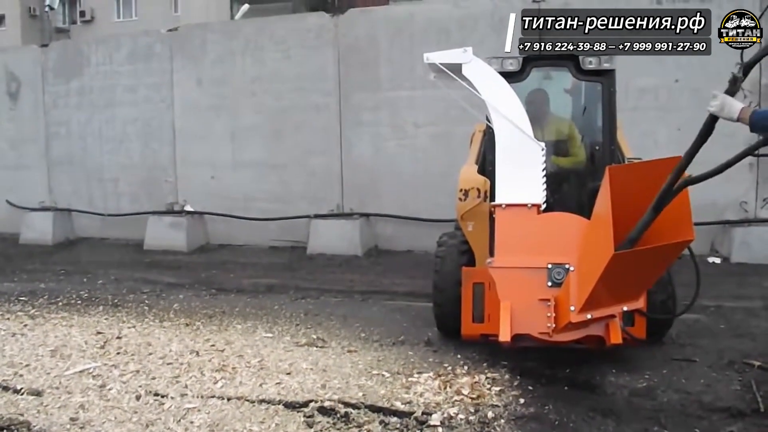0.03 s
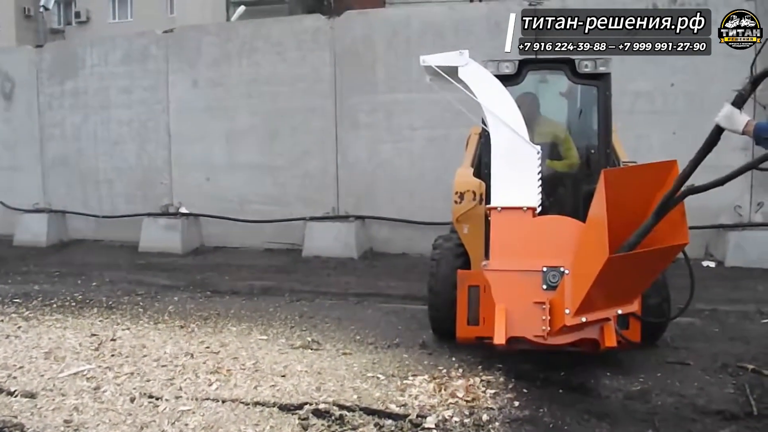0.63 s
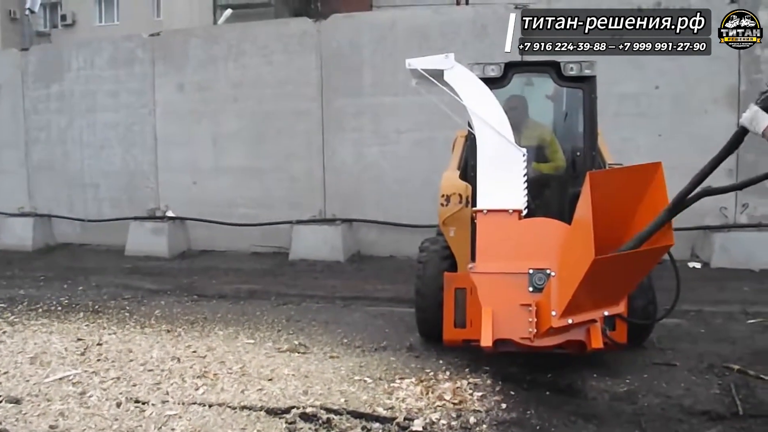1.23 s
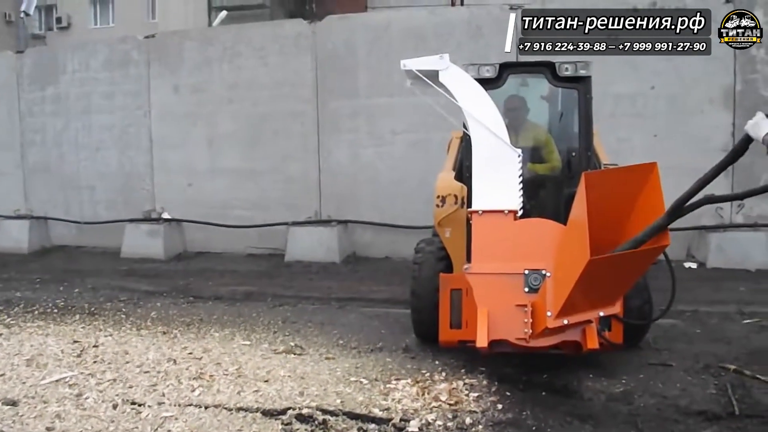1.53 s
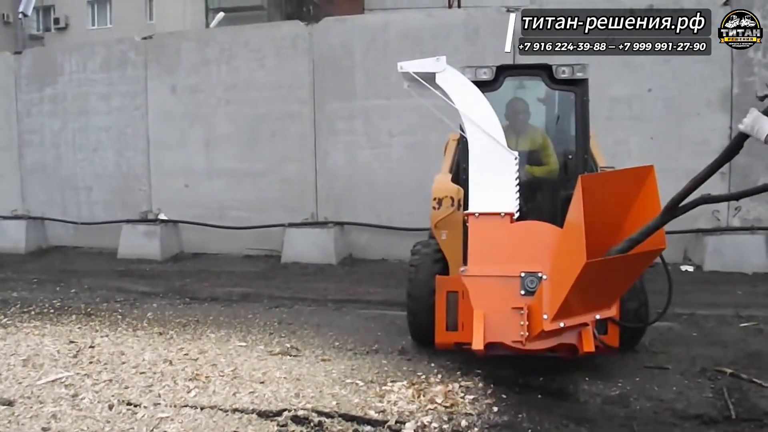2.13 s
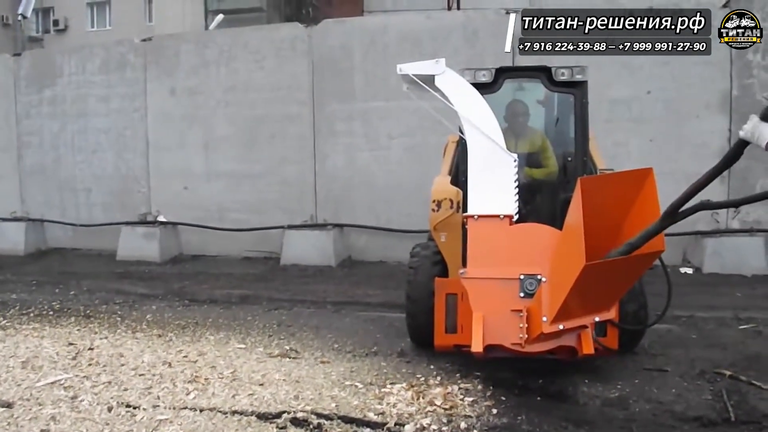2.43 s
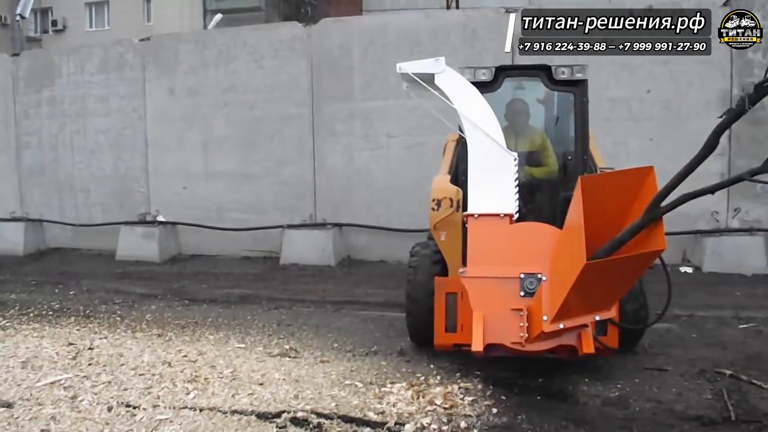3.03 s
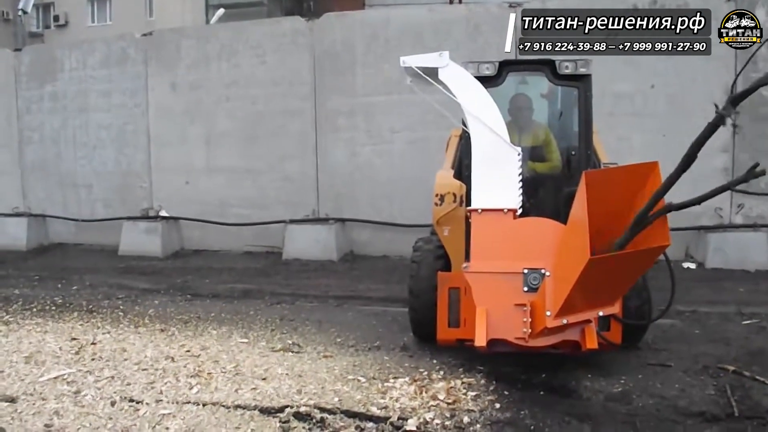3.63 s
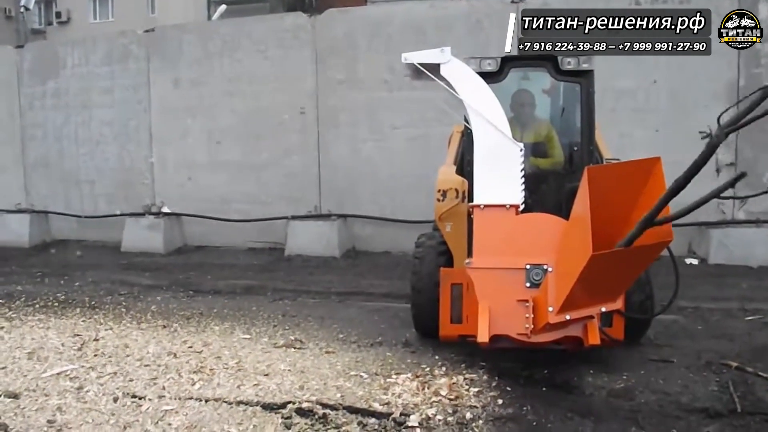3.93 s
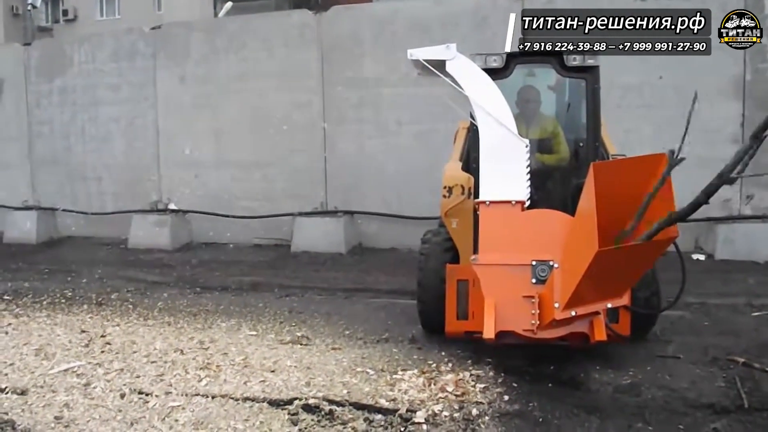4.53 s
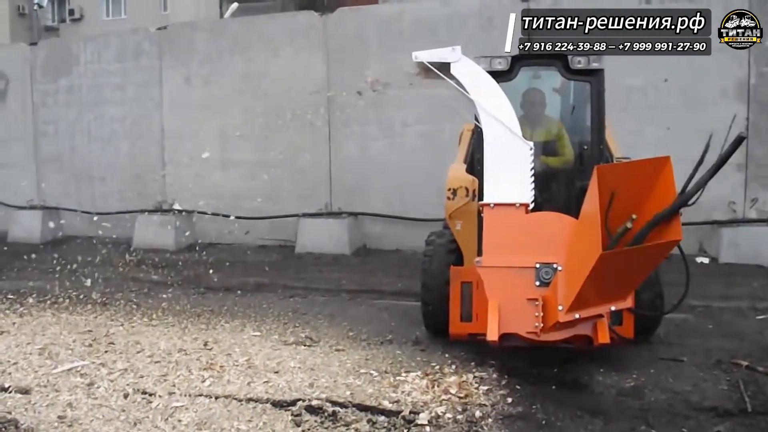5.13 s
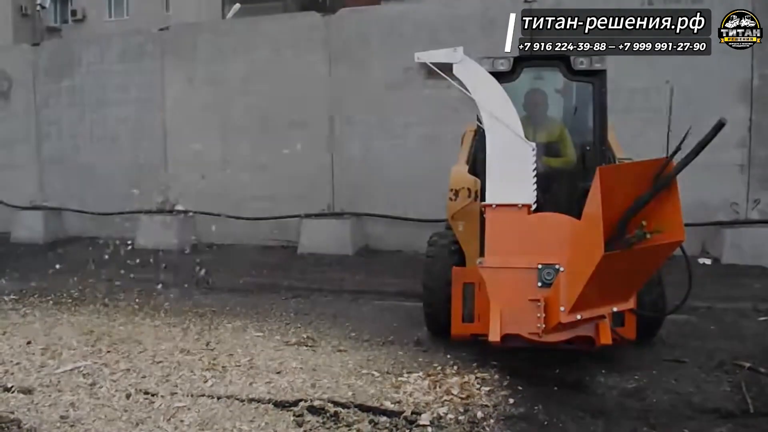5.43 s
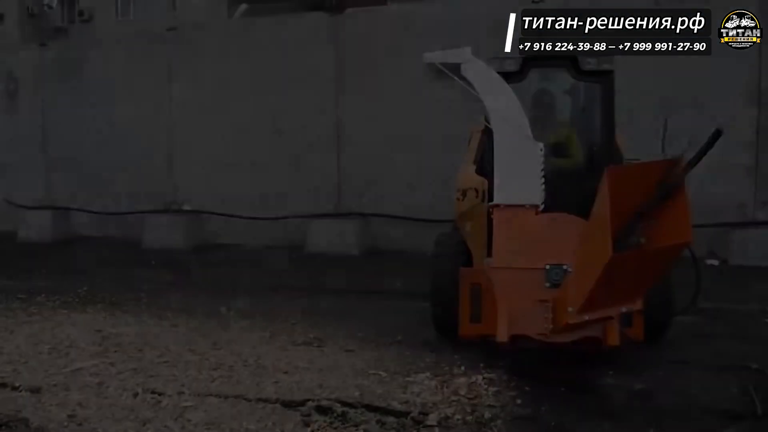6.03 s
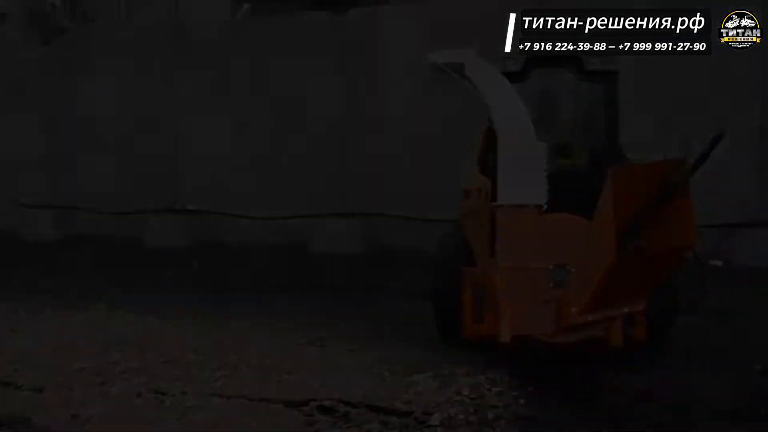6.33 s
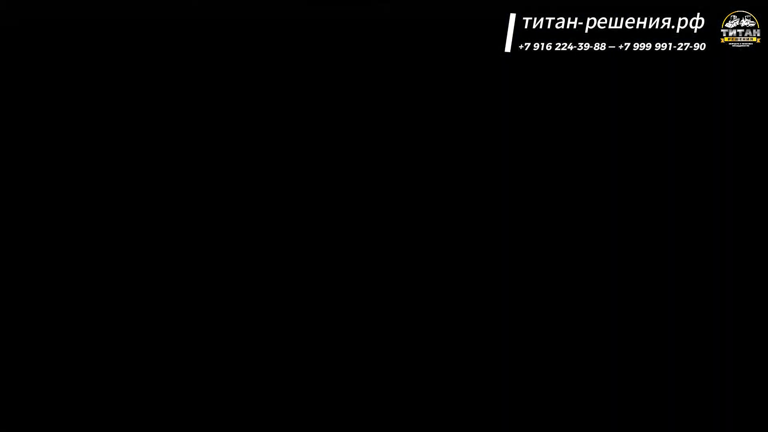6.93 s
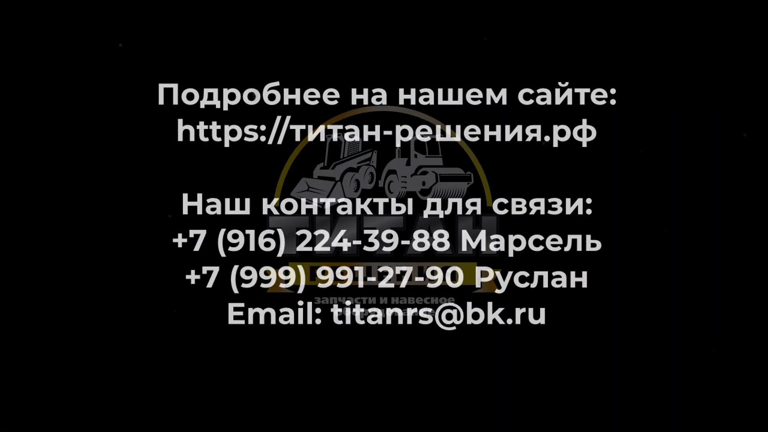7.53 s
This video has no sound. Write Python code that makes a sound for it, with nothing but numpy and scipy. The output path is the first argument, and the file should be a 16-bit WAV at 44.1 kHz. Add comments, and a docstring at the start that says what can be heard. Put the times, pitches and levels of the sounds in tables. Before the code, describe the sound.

A loud wood chipper is already running, a few metres away in an outdoor yard with a short, dull echo. A pulsing drone of air, a hydraulic hum and a high gear whine lie under a constant rattle of chips on steel. In the first second a branch chatters in the hopper and is torn up, with a brief rough squeal. The machine then runs more evenly, with surges of chips near 1.6 and 2.4 seconds. From about 3 seconds the bites crowd together: rasping wood, hollow booms, another short squeal and bright snaps, while the drone chokes away. Hard knocks strike the housing, the strongest near 4.9 and 5.6 seconds, and the hum swells briefly around 5.3. The drone partly returns near 6 seconds as the grinding continues. The sound fades from 6.8 seconds and stops just after 7.

```python
"""A disc wood chipper on a skid-steer loader runs at full speed in a yard, a concrete wall behind it.
From the start its paddles pump air, the hydraulic drive hums and chips stream out. Each time a branch is
drawn in, the knives tear it, the hopper booms and a surge of chips pelts the steel housing and spout.
Wood chatters, knocks and snaps; the hopper briefly rings out. After 3 s the bites crowd together and the
paddle tone chokes; it partly returns near 6 s, just before the sound fades and stops."""
import sys
import numpy as np
from scipy import signal
from scipy.fft import rfft, irfft
from scipy.io import wavfile
from scipy.ndimage import uniform_filter1d, minimum_filter1d

SR = 44100
rng = np.random.default_rng(int(sys.argv[2]) if len(sys.argv) > 2 else 0)


def int16_out(signal):
    """Quantize to a 16-bit WAV file."""
    q = np.round(np.clip(np.atleast_2d(signal).T, -1, 1) * 32767)
    wavfile.write(sys.argv[1], SR, q.astype(np.int16))


N = 342657
TIME = np.arange(N) / SR


def undb(db):
    """Decibels to gain."""
    return 10 ** (np.asarray(db) / 20)


def curves(table):
    """Automation curves: each column of a timed table at every sample."""
    time_s, *columns = np.transpose(table)
    return [np.interp(TIME, time_s, column) for column in columns]


def swollen(steady_db, power):
    """Level in dB of a steady bed with surges on top."""
    return 10 * np.log10(undb(steady_db) ** 2 + power)


def unit(x):
    """Scale to rms 1."""
    return x / np.sqrt(np.mean(x ** 2))


def walk(rate_hz):
    """Smooth random modulation: sample-and-hold, slewed twice; rms 1."""
    hold = max(int(SR / rate_hz), 2)
    held = rng.standard_normal(8192)[np.arange(N) // hold % 8192]
    return unit(uniform_filter1d(uniform_filter1d(held, hold), hold))


def colour(points, size=2048):
    """Minimum-phase impulse response of an EQ curve; unit energy."""
    hz, db = np.transpose(points)
    bins_hz = np.maximum(np.fft.rfftfreq(size, 1 / SR), 1)
    gain = undb(np.interp(np.log(bins_hz), np.log(hz), db))
    cepstrum = irfft(np.log(gain))
    cepstrum[1:size // 2] *= 2
    cepstrum[size // 2 + 1:] = 0
    response = irfft(np.exp(rfft(cepstrum)))
    return response / np.linalg.norm(response)


def ringing(modes, size=8192):
    """Impulse response of damped modes of alternating polarity; unit energy."""
    t = TIME[:size]
    response = sum(undb(db) * width * np.exp(-np.pi * width * t) * np.sin(2 * np.pi * hz * t + np.pi * k)
                   for k, (hz, width, db) in enumerate(modes))
    return response / np.linalg.norm(response)


def through(x, response):
    """Pass a sound through an impulse response."""
    return signal.oaconvolve(x, response)[:N]


def grains(per_s, spread_db):
    """Crackle: random clicks, more uneven as the spread grows; rms 1."""
    size = undb(spread_db * np.minimum(rng.standard_exponential(N), 4))
    return unit((rng.random(N) < per_s / SR) * size * rng.choice([-1, 1], N))


def tone(hz, wander, flutter_db):
    """A sine whose pitch and level waver; rms 1."""
    cycles = np.cumsum(hz * (1 + wander * walk(18))) / SR
    return unit(np.sin(2 * np.pi * cycles) * undb(flutter_db * walk(22)))


def blows(rows, strike_db, strike_s):
    """Noise bursts: a sharp transient over a dying crunch; rows of start_s, level_db, decay_s."""
    force, t = np.zeros(N), TIME[:SR // 8]
    for start_s, db, decay_s in rows:
        first = int(start_s * SR)
        envelope = np.exp(-t / decay_s) + undb(strike_db) * np.exp(-t / strike_s)
        force[first:first + len(t)] += undb(db) * envelope * rng.choice([-1, 1], len(t))
    return force


# air pumped by the paddles, choked once wood fills the inlet: time_s, tone_db, rumble_db
AIRFLOW = [(.1, -30, -23.5), (.2, -35, -35.5), (.58, -37, -38), (.68, -31.5, -26.5), (2.55, -27, -25.5),
           (3.15, -31, -26), (3.8, -57, -57), (4.19, -57, -26), (4.42, -60.5, -42), (5.3, -63, -43.5),
           (5.9, -47, -36), (6.8, -44, -36), (7.05, -50, -41)]
# harmonics of the paddle tone: paddle_rate_multiple, level_db
PADDLE_HARMONICS = [(1, 1), (2, -23), (3, -7.5), (4, -3), (5, 3.5), (7, -24), (8, -9.5), (9, -13)]
# dark rumble of the air: frequency_hz, gain_db
AIR_EQ = [(10, -19.5), (25, 5), (50, -2), (100, 1), (140, -5.5), (350, -2.5), (600, -3), (1000, -22),
          (8000, -59)]
def blower(turns_hz):
    """Three paddles pass the outlet on each turn, each shedding a puff of turbulence."""
    tone_db, rumble_db = curves(AIRFLOW)
    passes = 3 * np.cumsum(turns_hz) / SR
    drone = sum(undb(db) * tone(3 * k * turns_hz, wander=.0012, flutter_db=1.2)
                for k, db in PADDLE_HARMONICS)
    air = unit(through(rng.standard_normal(N), colour(AIR_EQ)))
    puffs = air * (1 + .24 * np.cos(2 * np.pi * passes))
    gusts = undb(1.5 * walk(12))
    return undb(tone_db) * drone + undb(rumble_db - 1.5) * puffs * gusts


# hum of the hydraulic motor: time_s, level_db
HUM_LEVEL = [(.6, -30.5), (.9, -26.5), (3.13, -23.5), (3.22, -38), (3.72, -36.5), (3.85, -25),
             (4.13, -24.5), (4.2, -37), (5.24, -34), (5.33, -16.5), (5.52, -42), (5.75, -24.5), (6.15, -21),
             (6.55, -24), (6.82, -19.5), (7.05, -33.5)]
# gear whine, weaker under load: time_s, level_db
WHINE_LEVEL = [(.6, -36), (1.5, -25), (3.1, -26.5), (3.6, -36), (5.4, -44)]
# further tones of the gears: pitch_hz, level_re_whine_db
GEAR_TONES = [(140, -9), (210, -6), (1276, -12), (2169, -14), (3698, -16), (5200, -25), (6900, -27),
              (7800, -28)]
def drive(turns_hz):
    """The hydraulic motor hums at 18 pulses a turn; the gears sing along at steady pitches."""
    hum_db, = curves(HUM_LEVEL)
    whine_db, = curves(WHINE_LEVEL)
    hum_hz = 18 * turns_hz
    hum = tone(hum_hz, wander=.003, flutter_db=1.8)
    octave = undb(-19) * tone(2 * hum_hz, wander=.003, flutter_db=3)
    gears = sum(undb(db) * tone(hz, wander=.003, flutter_db=3) for hz, db in GEAR_TONES)
    whine = tone(hz=3312, wander=.001, flutter_db=1.8)
    return undb(hum_db) * (hum + octave) + undb(whine_db) * (whine + gears)


# bed of chips between the surges: time_s, pelting_db, spray_db
CHIP_STREAM = [(0, -13.5, -31), (.2, -19, -38.5), (.55, -19, -37.5), (.68, -16, -32), (1.7, -16, -33.5),
               (3.5, -17, -33), (3.7, -16, -30.5), (4.08, -20.5, -42), (4.3, -15, -30), (4.9, -18, -35),
               (5.2, -18, -38.5), (5.4, -25, -43), (5.7, -19.5, -38.5), (6.2, -19.5, -37.5),
               (6.38, -26.5, -48), (6.8, -24, -45)]
# hard clatter of wood on steel: frequency_hz, gain_db
STEEL_EQ = [(500, -26), (1500, -11), (2350, -8.5), (2800, -2), (3250, 1), (3600, -4), (4000, -12.5),
            (5000, -26), (7000, -32.5), (15000, -63.5)]
# ring of the steel housing: pitch_hz, width_hz, level_db
STEEL_MODES = [(2620, 50, -19), (2775, 70, -13), (3005, 70, -7), (3125, 70, -5), (3192, 60, -1),
               (3255, 60, -2), (3315, 60, -1), (3385, 80, -5), (3520, 80, -9), (3700, 60, -16)]
# bright sizzle at the spout: frequency_hz, gain_db
SPRAY_EQ = [(2000, -22.5), (4000, 7), (5000, 3), (6000, -3), (7000, -9.5), (8500, -16.5), (10500, -17),
            (13000, -24.5), (16000, -31.5)]
def chips(turns_hz, surge_power):
    """Each paddle flings a clump of chips at the housing; splinters crackle out of the spout."""
    stream_db, spout_db = curves(CHIP_STREAM)
    steel_db = swollen(stream_db, surge_power)
    spray_db = swollen(spout_db, surge_power * undb(-17.5) ** 2)  # a little of each surge is spray
    fling = 1 + .09 * np.cos(2 * np.pi * 3 * np.cumsum(turns_hz) / SR)
    clumps = fling * undb(.6 * walk(40) + 1.2 * walk(170))
    pelting = unit(through(clumps * grains(per_s=2200, spread_db=.5), colour(STEEL_EQ)))
    ring = unit(through(clumps * grains(per_s=1200, spread_db=3.5), ringing(STEEL_MODES)))
    splinters = 0
    for band_hz in [(2500, 5500), (5500, 8000), (8000, 16000)]:  # each splinter size has its own bursts
        bursts = grains(per_s=6000, spread_db=0) * undb(2 * walk(110))
        splinters += signal.sosfilt(signal.butter(2, band_hz, "bandpass", fs=SR, output="sos"), bursts)
    spray = unit(through(clumps * splinters, colour(SPRAY_EQ)))
    return undb(steel_db) * (undb(-4.5) * pelting + undb(-6) * ring) + undb(spray_db + 2) * spray


# wood pressing on the disc between bites: time_s, cut_db, boom_db
RUBBING = [(.8, -24.5, -22), (1.05, -30, -28), (3.2, -28.5, -29.5), (3.6, -24, -27.5), (4.3, -22.5, -24),
           (4.8, -28, -23), (5.4, -28, -25), (6.2, -23, -21.5), (7.1, -26.5, -26.5)]
# midrange rasp of tearing wood: frequency_hz, gain_db
CUT_EQ = [(150, -25), (400, 1), (800, 2.5), (1300, 3.5), (2000, -0.5), (2600, -0.5), (4000, -11.5),
          (8000, -44.5)]
# clang of the hopper walls: pitch_hz, width_hz, level_db
WALL_MODES = [(702, 18, 1), (775, 24, -2), (858, 20, 2), (930, 28, 1), (1010, 45, -3), (1140, 35, -5),
              (1270, 45, -3), (1620, 30, -2), (1685, 40, -4), (1950, 110, -7)]
# boom of the air in the hopper: pitch_hz, width_hz, level_db
HOPPER_MODES = [(76.4, 7.5, -15.5), (174, 14, -10.5), (210.3, 16, -3), (241.3, 13, -1.5), (285.3, 6.3, 6),
                (372, 26, -1.5), (465.5, 11, -10.5), (582.5, 37, -15)]
def knives(turns_hz, cut_power, boom_power):
    """Three knives tear fibres, one deepest on each turn; the hopper booms and its walls ring."""
    rubbing_db, drone_db = curves(RUBBING)
    cut_db = swollen(rubbing_db, cut_power)
    boom_db = swollen(drone_db, boom_power)
    turns = np.cumsum(turns_hz) / SR
    every_knife = .85 + .57 * np.exp(-(3 * turns % 1) / .78)
    deep_knife = 1 + .83 * np.exp(-(turns % 1) / .68)
    force = every_knife * deep_knife * undb(1.8 * walk(45))
    tearing = unit(through(force * grains(per_s=3500, spread_db=3), colour(CUT_EQ)))
    walls = unit(through(force * grains(per_s=2000, spread_db=4), ringing(WALL_MODES)))
    boom = unit(through(force * rng.standard_normal(N), ringing(HOPPER_MODES)))
    return undb(cut_db - 3.5) * (tearing + walls) + undb(boom_db - 2.5) * boom


# a branch is drawn into the knives: start_s, length_s, cut_db, boom_db, chip_surge_db
BITES = [(0.074, .03, -22.5, -17, -18), (0.23, .33, -23, -22, -24.5), (.635, 0.11, -23.5, -20.5, -21),
         (0.78, 0.13, -24, -39, -38), (1.595, .05, -35, -25, -14.5), (2.44, 0.068, -24.5, -19.5, -17),
         (3.068, 0.14, -27.5, -19.5, -23.5), (3.233, 0.21, -19.5, -28, -36), (3.438, 0.11, -16.5, -19, -31),
         (3.558, 0.13, -25, -32, -15.5), (3.843, 0.02, -23, -38, -15), (4.017, 0.061, -25, -32.5, -29),
         (4.139, 0.11, -17.5, -22.5, -23), (4.613, 0.015, -30.5, -29.5, -11.5),
         (4.679, 0.0095, -32, -29, -14.5), (4.753, .02, -45, -38, -16), (4.807, 0.03, -28, -32, -14.5),
         (4.972, 0.014, -24, -29.5, -14), (5.065, 0.023, -24.5, -23, -16),
         (5.224, 0.04, -22.5, -27.5, -14.5), (5.421, 0.055, -34, -30, -23.5),
         (5.526, 0.067, -22.5, -22.5, -18.5), (5.686, 0.028, -25, -22.5, -24),
         (5.766, 0.035, -22.5, -23, -21), (5.861, 0.019, -26.5, -23, -17), (5.938, 0.069, -26, -31, -16.5),
         (6.118, 0.084, -19.5, -20, -15), (6.266, 0.044, -19.5, -24, -17),
         (6.413, 0.082, -22, -21.5, -18.5), (6.551, 0.021, -20.5, -27, -15),
         (6.645, 0.061, -23, -18.5, -17.5), (6.744, 0.054, -24.5, -19.5, -33)]
def bites(attack_s=.0045, release_s=.032):
    """Each bite rises, holds and dies away: power envelopes for the cut, the boom and the chips."""
    power = np.zeros((3, N))
    for start_s, length_s, *levels_db in BITES:
        first, last = np.searchsorted(TIME, [start_s, start_s + length_s + 8 * release_s])
        t = TIME[first:last] - start_s
        envelope = np.minimum(t / attack_s, 1) * np.exp(-np.maximum(t - length_s, 0) / release_s)
        power[:, first:last] += (undb(levels_db)[:, None] * envelope) ** 2
    return power


# a branch rattles in the hopper: start_s, length_s, level_db
CHATTER = [(0.096, .02, -4), (0.145, .02, -11.5), (.244, .32, -9), (.632, .02, -15.5), (0.778, .02, -7.5),
           (3.246, .07, -7), (4.027, .02, -7), (4.188, .02, -13), (5.424, .02, -14.5), (5.935, .02, -9),
           (6.561, .02, -8.5)]
def chatter(turns_hz, decay_s=.0092):
    """Kicked once on every turn, a branch clangs against the hopper walls."""
    hits = []
    for start_s, length_s, db in CHATTER:
        turn_s = 1 / np.interp(start_s, TIME, turns_hz)
        hits += [(start_s + delay_s, db, decay_s) for delay_s in np.arange(0, length_s, turn_s)]
    kicks = blows(hits, strike_db=-4.5, strike_s=.0015)
    return undb(-8) * through(kicks, colour(CUT_EQ)) + undb(-6) * through(kicks, ringing(WALL_MODES))


# blocks striking the housing: start_s, level_db, splash_db
KNOCKS = [(0.097, -6, -45), (2.241, -9, -37), (2.62, -7.5, -41.5), (3.568, -10.5, -38), (4.363, -4, -38),
          (4.424, -7.5, -40), (4.486, -9.5, -45), (4.62, -7.5, -35.5), (4.729, -8, -42),
          (4.901, -0.5, -32.5), (5.153, -6.5, -43.5), (5.331, -10.5, -36.5), (5.568, 0, -27),
          (5.598, -9.5, -40), (5.91, -11, -37), (5.934, -6.5, -30), (5.997, -10, -39), (6.408, -10.5, -38),
          (6.482, -14.5, -40), (6.674, -13, -45), (6.902, -18, -48), (6.964, -6, -34), (7.029, -19, -49)]
def knocks(decay_s=.0046, splash_s=.0012):
    """A block rings the steel housing; loud knocks add a brief bright splash, like microphone overload."""
    hits = blows([(s, db, decay_s) for s, db, _ in KNOCKS], strike_db=-3, strike_s=.0029)
    splash = blows([(s, db, splash_s) for s, _, db in KNOCKS], strike_db=-1, strike_s=splash_s)
    clack = through(hits, colour(STEEL_EQ))
    ring = through(hits, ringing(STEEL_MODES))
    return splash + undb(-3.5) * clack + undb(-7) * ring


# one flying splinter: start_s, level_db, decay_s
PING_HIT = [(.617, -38, .007)]
# high ring of thin steel: pitch_hz, width_hz, level_db
PING_MODES = [(10000, 45, 0), (11400, 40, -3)]
def ping():
    """A splinter pings off thin steel."""
    return through(blows(PING_HIT, strike_db=5, strike_s=.001), ringing(PING_MODES))


# fibres breaking: start_s, level_db
SNAPS = [(0.619, -21), (3.576, -14), (3.626, -20.5), (3.679, -18.5), (3.791, -24), (4.23, -16),
         (4.25, -13.5), (4.593, -21), (4.827, -24), (5.244, -20.5), (5.571, -16), (5.91, -22.5),
         (5.937, -20.5), (6.096, -21), (6.411, -27)]
# crisp edge of a snap: frequency_hz, gain_db
SNAP_EQ = [(2500, -11), (5000, 16.5), (7500, 2), (11000, -13.5), (16000, -20.5)]
def snaps(decay_s=.0056):
    """Fibres give way with short, bright cracks."""
    cracks = blows([(s, db, decay_s) for s, db in SNAPS], strike_db=-3, strike_s=.0012)
    return undb(-2) * through(cracks, colour(SNAP_EQ))


# hopper resonances ringing out: start_s, length_s, pitch_hz, level_db
HOPPER_TONES = [(.775, .115, 860, -19), (3.24, .095, 862, -14.5), (3.435, .09, 288, -17)]
def hopper_tones():
    """The hopper rings out in a short, rough, squeal-like tone with its octave."""
    out = np.zeros(N)
    for start_s, length_s, hz, db in HOPPER_TONES:
        progress = np.clip((TIME - start_s) / length_s, 0, 1)
        swell = np.sqrt(np.abs(np.sin(np.pi * progress)))
        phase = 2 * np.pi * np.cumsum(hz * (1 + .03 * walk(300))) / SR
        out += undb(db) * swell * (np.sin(phase) + undb(-12) * np.sin(2 * phase))
    return out


def yard(x, t60_s, wet_db, predelay_s=.004):
    """Ground, loader and concrete wall scatter a short, dull echo."""
    t = TIME[:SR // 2]
    tail = rng.standard_normal(len(t)) * 1000. ** (-t / t60_s) * (t > predelay_s)
    tail = signal.sosfilt(signal.butter(1, [600, 7000], "bandpass", fs=SR, output="sos"), tail)
    return x + undb(wet_db) * through(x, tail / np.linalg.norm(tail))


# speed of the disc, the pulse of the machine: time_s, turns_hz
DISC_SPEED = [(0, 20.62), (1.3, 20.8), (3.3, 20.7), (3.9, 21.3), (5.3, 21.14), (6.2, 20.76), (7.14, 20.83)]
def scene():
    """The whole machine in mono, a few metres away."""
    turns_hz, = curves(DISC_SPEED)
    cut_power, boom_power, surge_power = bites()
    machine = blower(turns_hz) + drive(turns_hz)
    chipping = knives(turns_hz, cut_power, boom_power) + chips(turns_hz, surge_power)
    accents = knocks() + chatter(turns_hz) + snaps() + ping() + hopper_tones()
    return yard(machine + chipping + accents, t60_s=.26, wet_db=-15)[None]


CEILING_DB, LIMITER_S, TOP_HZ = -.2, .003, 15850
FADE_START_S, FADE_DB_PER_S, STOP_S = 6.797, 36, 7.137
def record(dry):
    """A limiter holds the highest peaks, the sound fades and stops short, and the top is cut."""
    span = int(LIMITER_S * SR)
    overshoot = np.maximum(np.abs(dry) / undb(CEILING_DB), 1)
    gain = uniform_filter1d(minimum_filter1d(1 / overshoot, span), span)
    fade = undb(-FADE_DB_PER_S * np.maximum(TIME - FADE_START_S, 0))
    gate = np.clip((STOP_S - TIME) / .003, 0, 1)
    lowpass = signal.ellip(12, .1, 90, TOP_HZ, fs=SR, output="sos")
    return signal.sosfilt(lowpass, dry * gain * fade * gate)


dry = scene()
out = record(dry)
int16_out(out)
```